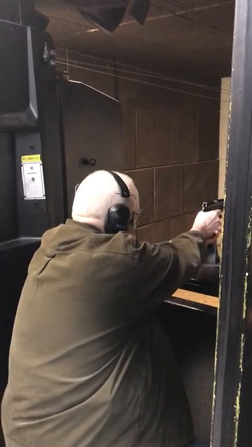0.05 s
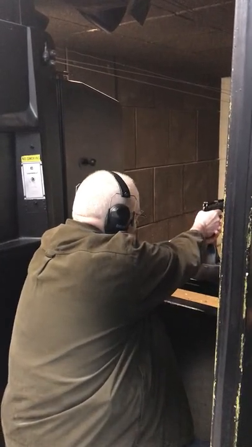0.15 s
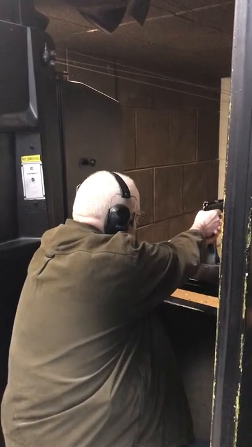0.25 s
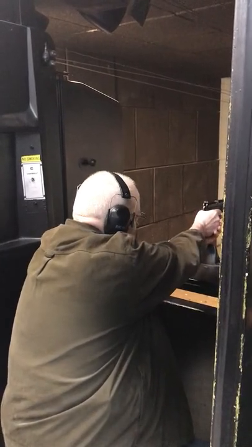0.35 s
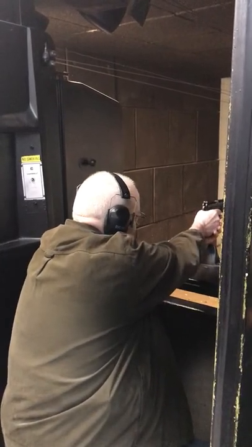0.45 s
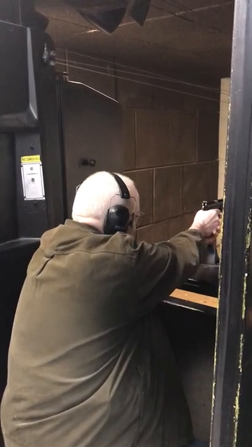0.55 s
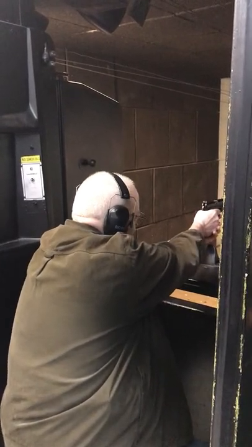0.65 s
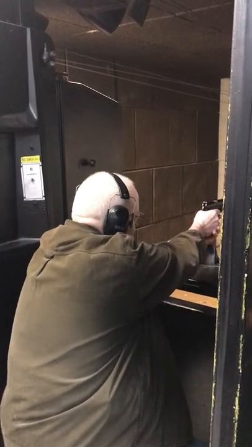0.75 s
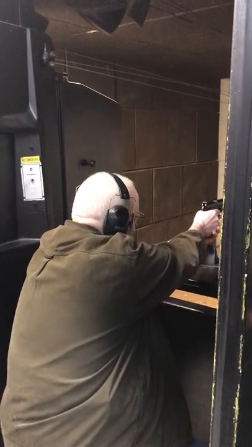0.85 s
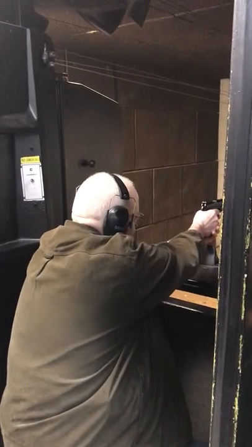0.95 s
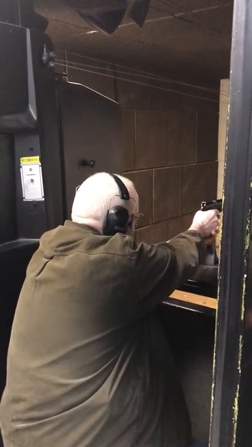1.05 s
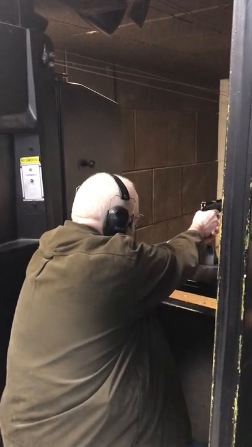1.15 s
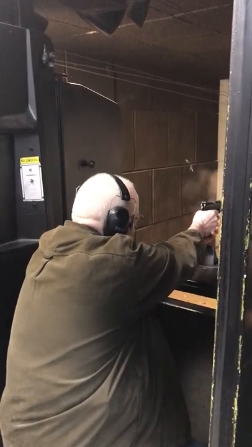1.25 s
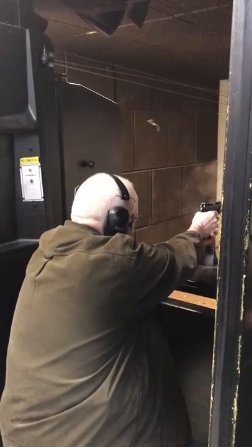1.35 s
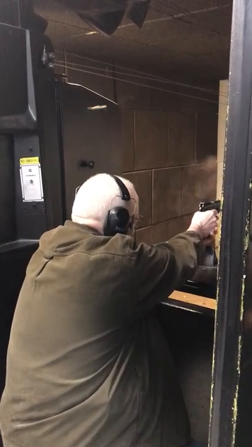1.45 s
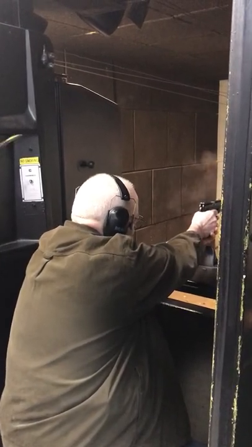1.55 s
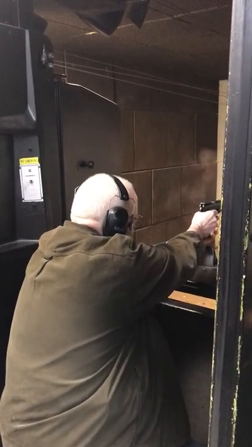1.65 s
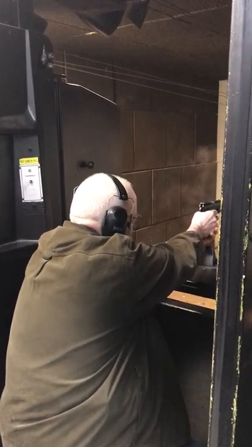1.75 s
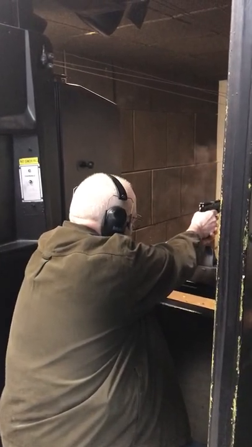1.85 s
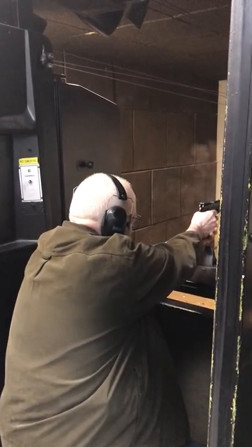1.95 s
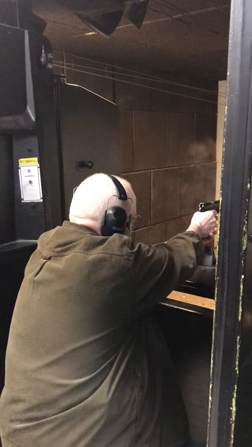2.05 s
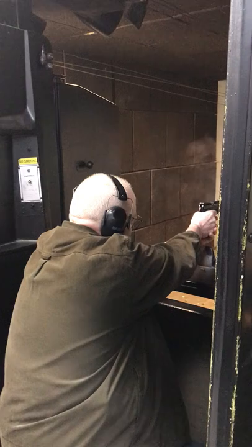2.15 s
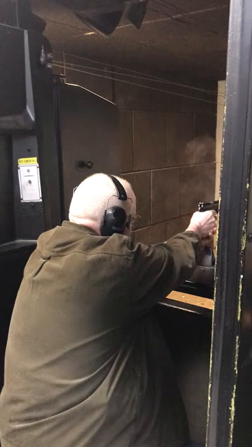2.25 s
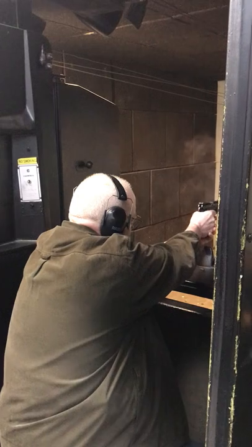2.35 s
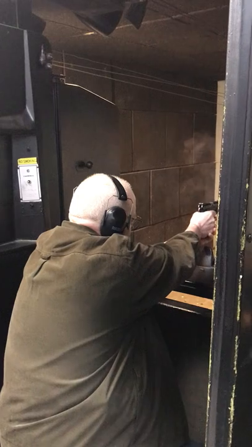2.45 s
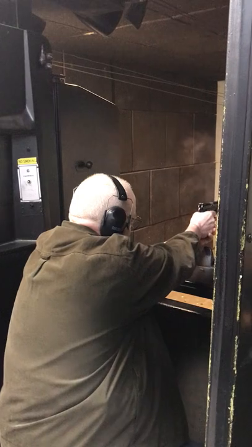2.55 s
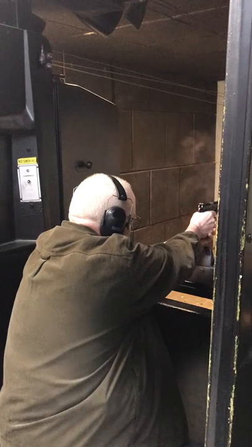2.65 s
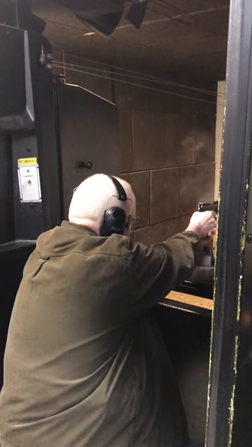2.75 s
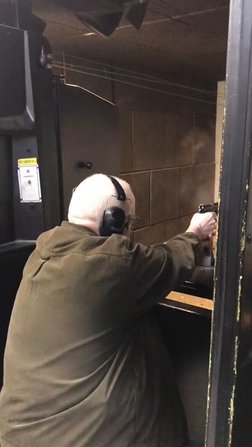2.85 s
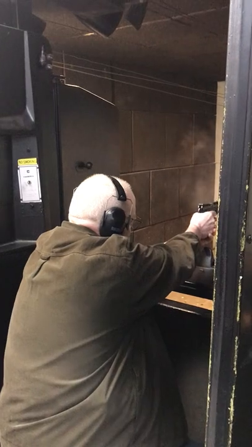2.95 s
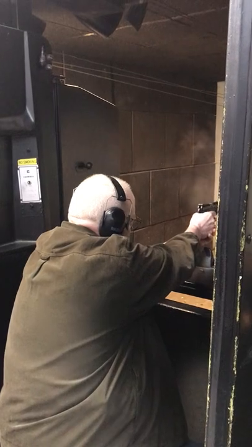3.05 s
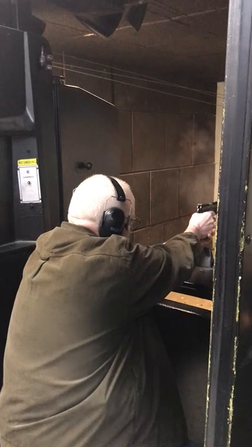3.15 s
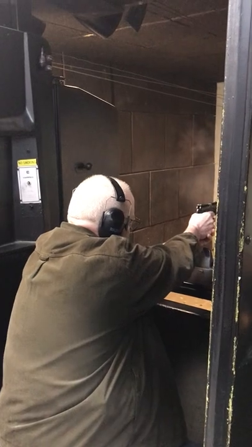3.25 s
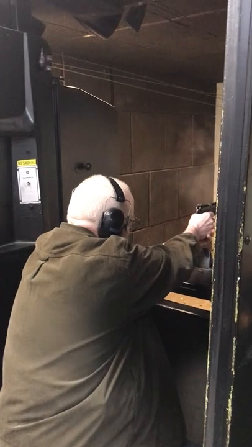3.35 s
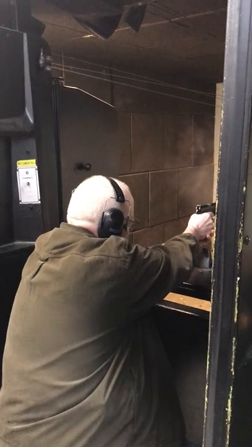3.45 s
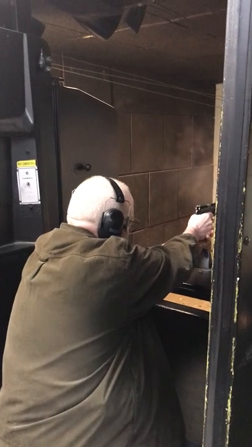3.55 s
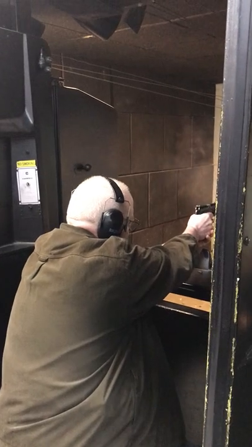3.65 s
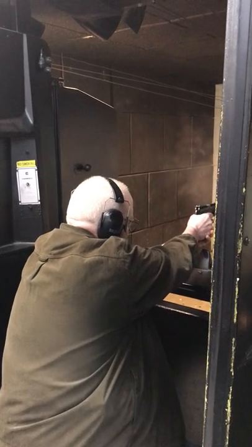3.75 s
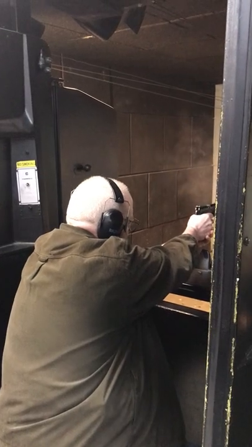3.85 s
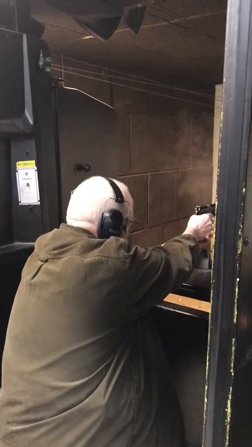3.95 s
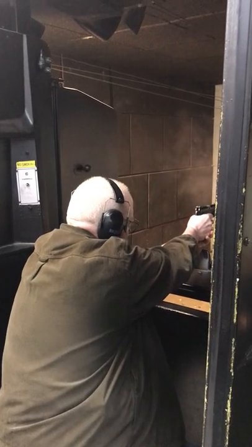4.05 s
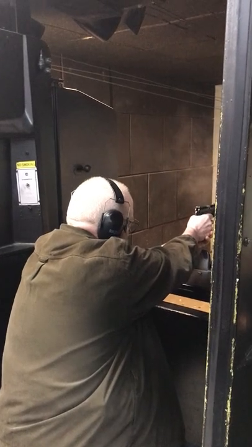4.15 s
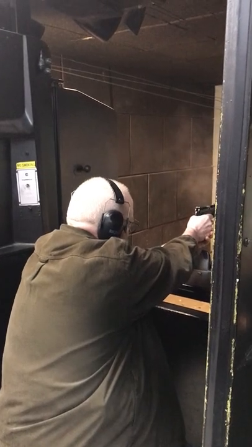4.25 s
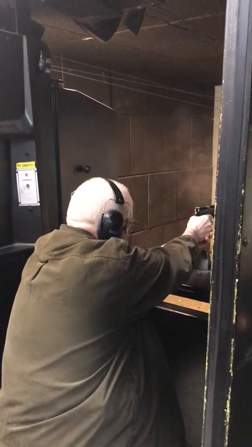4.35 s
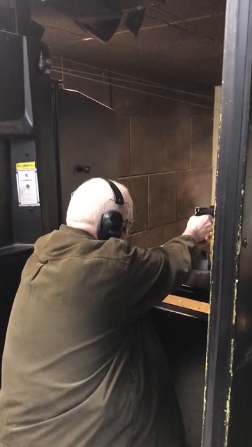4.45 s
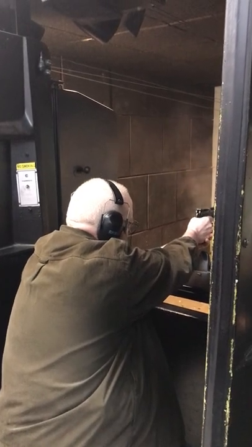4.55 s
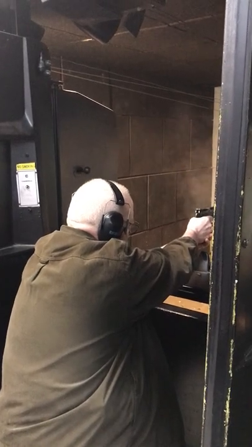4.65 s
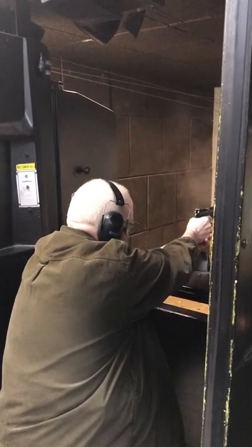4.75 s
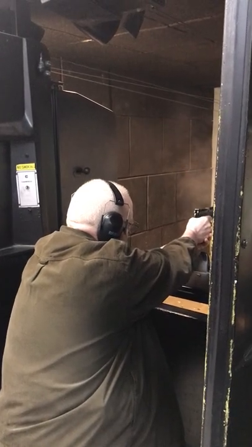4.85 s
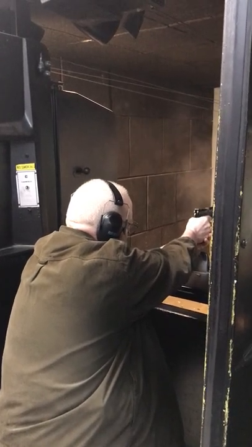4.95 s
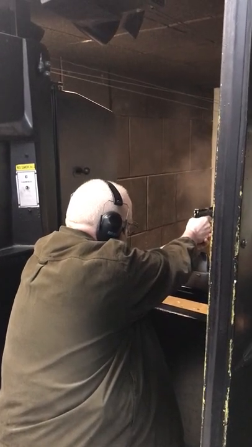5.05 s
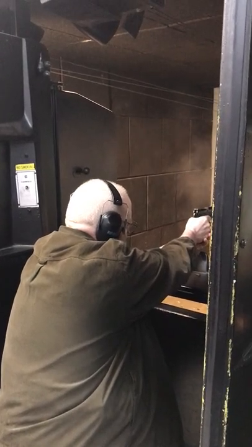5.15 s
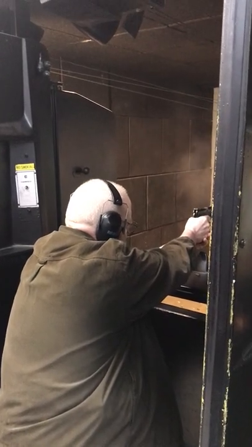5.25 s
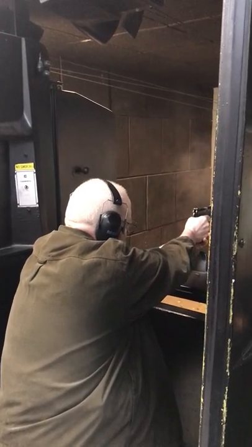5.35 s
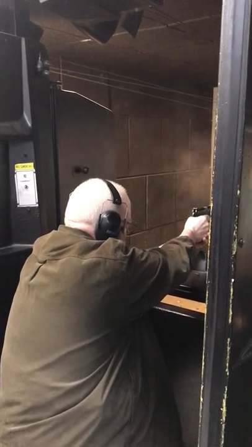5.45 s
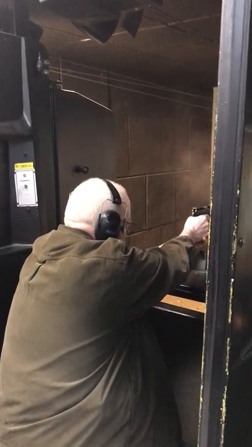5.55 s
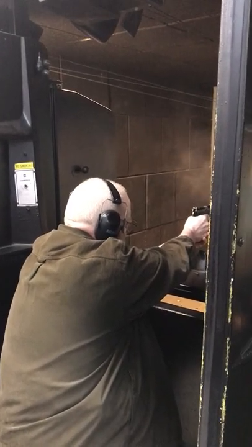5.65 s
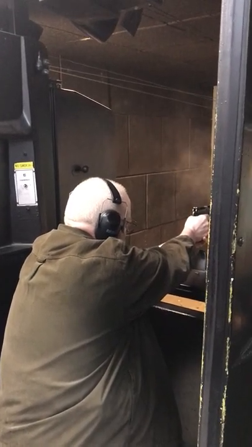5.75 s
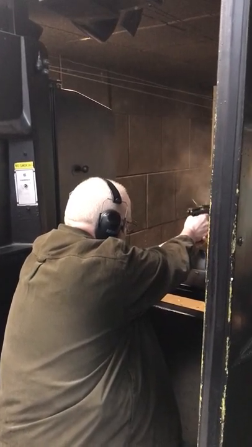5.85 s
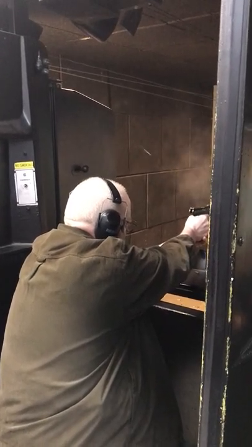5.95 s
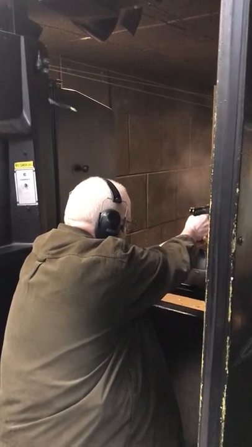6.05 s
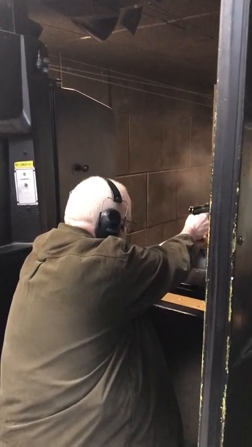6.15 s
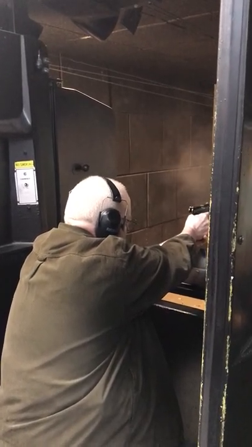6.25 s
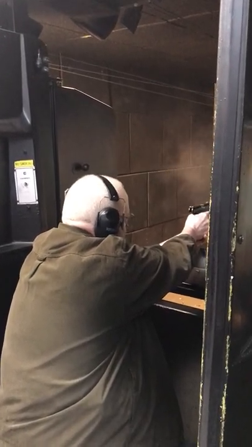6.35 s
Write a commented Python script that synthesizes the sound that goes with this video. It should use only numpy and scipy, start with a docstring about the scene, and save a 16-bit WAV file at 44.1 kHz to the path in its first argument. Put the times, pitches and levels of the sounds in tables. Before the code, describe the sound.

Four loud, overloaded pistol shots boom through a concrete indoor range, each with ringing reverberation, while spent brass cases clink down over faint ventilation.

```python
"""Pistol shots in a concrete indoor range

Four shots heard from just behind the booth: decaying noise and ringing modes, overloading the input.
Every shot sets off the same long reverberation, plus a fresh layer of first reflections.
Brass cases land with clicks, knocks and rings of resonant noise, and one of them skids.
Underneath, ventilation hums in sines and rushes as noise, with faint ticking for the first 4.6 s."""
import sys
import numpy as np
from scipy import signal
from scipy.fft import rfft, irfft, next_fast_len
from scipy.io import wavfile

SR = 44100
rng = np.random.default_rng(int(sys.argv[2]) if len(sys.argv) > 2 else 0)


def persist_wave(psi):
    """Save psi, clipped to +-1, as 16-bit WAV."""
    counts = np.round(np.clip(psi, -1, 1) * 32767).astype(np.int16)
    wavfile.write(sys.argv[1], SR, np.atleast_2d(counts).T)


N = 282681

# fan hum: (frequency [Hz], level [dB rms])
FAN_HUM = [(240, -70.5), (300, -85), (360, -70.5), (480, -82), (720, -77), (1320, -83)]
# moving air: (frequency [Hz], level [dB per octave])
MOVING_AIR = [(30, -73), (63, -73.5), (125, -77.5), (250, -77.5), (500, -75.5), (1000, -78), (2000, -80),
              (4000, -79), (8000, -78), (15000, -79)]
# cases landing: (time [s], low ring [dB], high ring [dB], knock [dB], knock centre [Hz])
CASE_LANDINGS = [(2.1, -55, -72, -44.5, 3880), (2.341, -45, -59, -54, 6400), (2.678, -49.5, -62, -58, 7230),
                 (3.397, -65, -60, -63, 8500), (3.895, -58, -65, -59, 4710), (4.018, -64, -70, -69, 5400),
                 (4.286, -63, -68, -63, 4800), (5.173, -60, -63, -51, 8600), (5.776, -42.5, -50, -50, 7200),
                 (6.258, -53, -56, -55, 8500)]
# modes of a brass case: (frequency [Hz], width [Hz], level over the ring level [dB], t60 [s])
BRASS_MODES = [(5135, 500, -7, .2), (5450, 320, -2.5, 0.3), (5680, 320, -3, .22), (6300, 550, -9.5, 0.34),
               (6600, 150, -17, 0.17), (8096, 150, -21, 0.14), (11000, 1500, -8.5, .16),
               (12000, 220, -5.5, .24)]
# shots: (time [s], strength [dB]); the levels in the five tables below are before this strength
SHOTS = [(1.2443, -1.9), (2.7482, -2.5), (4.4464, -2.5), (5.9114, -2.5)]
# first reflections inside the booth: (frequency [Hz], level [dB per octave], t60 [s])
BOOTH_REFLECTIONS = [(30, -22.5, 0.6), (63, -10, 0.22), (125, 1, .4), (245, 4, 0.28), (460, 15.5, .37),
                     (1000, 16, .37), (2000, 16, .36), (4000, 15, 0.38), (7640, 7, .28), (14900, 4, .23)]
# reverberation of the lane: (frequency [Hz], level [dB per octave], t60 [s])
LANE_REVERB = [(30, -37, 0.54), (63, -28, 0.29), (126, -15, 1.05), (242, -9, 1.035), (490, 0.5, 0.82),
               (1070, 9, 0.78), (1930, 4.5, 0.78), (4160, 0.5, 0.74), (6500, 1.5, 0.55), (9400, -7, 0.36),
               (14000, -9.5, .28)]
# what lingers at the far end of the hall: (frequency [Hz], level [dB per octave], t60 [s])
FAR_END_REVERB = [(30, -67, 9.6), (62, -54.5, 6.8), (125, -50.5, 2.2), (250, -44, 2.3), (500, -36.5, 2.4),
                  (997, -31, 3), (1990, -31, 2.4), (4000, -33, 1.6), (6700, -43, 1.25), (9500, -57, 1.1),
                  (14000, -73, 1.0)]
# standing waves between the walls: (frequency [Hz], level [dB], t60 [s])
WALL_MODES = [(172, -15, 1.05), (306, -7, .85), (348, -6, .8), (566, 3, .68), (592, -6, .85),
              (766, -2, .68), (812, -3, .68), (1056, -3, .68), (1256, -2, .68), (1394, -7, .75),
              (1726, -3, .7), (2003, 0, .7), (2125, -6, .7), (2620, -5, .7), (2805, -6, .7)]
# steelwork that keeps ringing after the blast: (frequency [Hz], level [dB], t60 [s])
STEEL_MODES = [(662, -28, 1.8), (729, -25, 1.9), (815, -29, 2.0), (832, -37, 2.9), (1001, -42, 3.8),
               (1035, -44, 4.2), (1084, -37, 2.6), (1188, -23, 1.75), (1340, -25, 1.8), (1427, -31, 1.8),
               (1507, -48, 3.4), (1609, -30, 1.8), (1797, -50, 3.2)]

# a harder contact knocks higher and much more broadly: the width grows as a power of the centre
KNOCK_HZ, KNOCK_WIDTH_HZ, KNOCK_BROADENING = 4000, 1900, 2.1
KNOCK_T60_S, KNOCK_TOP_HZ = 0.23, 14000
CLICK_DB, CLICK_T60_S = 4, 0.017  # contact click, relative to the knock
BUILD_S = 0.0027  # reflections pile up this quickly
SKID_AT_S, SKID_SWELL_S, SKID_DB, SKID_HZ, SKID_WIDTH_HZ = 2.267, 0.01, -36.5, 4240, 5900
SKID_LOW_RING_DB, SKID_HIGH_RING_DB = -62, -45
# a lull while the blast is away down the lane; the roar also sloshes once per round trip
LULL_AT_S, LULL_WIDTH_S, LULL_DB = 0.036, 0.015, -7.5
ROUND_TRIP_S, SLOSH_DB = 0.108, 0.5
CLIP_LEVEL = 0.63  # ceiling of the overloaded input, as a fraction of full scale
CUTOFF_HZ = 15900


def from_db(db):
    """Decibels to gain."""
    return 10 ** (np.asarray(db) / 20)


def at_hz(rows, hz, axis=1):
    """One column of a table, read on a log-frequency axis."""
    rows = np.array(rows)
    return np.interp(np.log(np.maximum(hz, 1)), np.log(rows[:, 0]), rows[:, axis])


def fade(t, t60):
    """Exponential decay, 60 dB down at t60."""
    return np.exp(-np.log(1000) * t / t60)


def rise(t, rise_s):
    """Exponential approach to full level."""
    return 1 - np.exp(-t / rise_s)


def add(out, s, sound):
    """Mix a sound in at time s, cutting whatever runs past the end."""
    start = int(round(s * SR))
    out[start:start + len(sound)] += sound[:max(len(out) - start, 0)]


def pink(size):
    """Frequencies and random spectrum of a noise above 16 Hz with rms 1 in every octave."""
    hz = np.maximum(np.arange(size // 2 + 1) * SR / size, 1)
    equal_octaves = np.sqrt(SR / (2 * np.log(2) * hz))
    return hz, rfft(rng.standard_normal(size)) * equal_octaves * (hz > 16)


def coloured(rows, size):
    """Noise with the given dB per octave."""
    hz, spectrum = pink(size)
    return irfft(spectrum * from_db(at_hz(rows, hz)), size)


def narrow_noise(centre_hz, width_hz, size):
    """Noise through a resonance applied twice; rms 1."""
    hz = np.arange(size // 2 + 1) * SR / size
    resonance_twice = 1 / (1 + (2 * (hz - centre_hz) / width_hz) ** 2)
    noise = irfft(rfft(rng.standard_normal(size)) * resonance_twice, size)
    return noise / noise.std()


def ventilation(tick_db=-72, tick_hz=3200, tick_width_hz=3500, tick_peak_s=0.008, tick_gap_s=0.051):
    """Steady hum of sines and rushing air, with a faint uneven ticking of noise."""
    t = np.arange(N) / SR
    hum = np.zeros(N)
    for hz, db in FAN_HUM:
        hum += np.sqrt(2) * from_db(db) * np.sin(2 * np.pi * (hz * t + rng.random()))
    age = t[:SR // 10] / tick_peak_s
    tick_shape = age * np.exp(1 - age)
    ticks = np.zeros(N)
    for k, (late, loud) in enumerate(rng.random(size=(90, 2))):
        add(ticks, (k + late / 2) * tick_gap_s, loud * tick_shape)
    size = next_fast_len(N)
    air = coloured(MOVING_AIR, size)[:N]
    tick_noise = narrow_noise(tick_hz, tick_width_hz, size)[:N]
    return hum + air + from_db(tick_db) * ticks * tick_noise


def contact_noise(centre_hz, width_hz, size):
    """Broad noise of brass meeting a hard surface, its top absorbed by the room."""
    absorb = signal.butter(2, KNOCK_TOP_HZ, fs=SR, output="sos")
    return signal.sosfilt(absorb, narrow_noise(centre_hz, width_hz, size))


def brass_ring(t, low_db, high_db):
    """A thin case rings, smeared by the room; where it is hit decides between its low and high modes."""
    out = np.zeros(len(t))
    for hz, width_hz, db, t60 in BRASS_MODES:
        strength_db = high_db if hz > 10000 else low_db
        out += from_db(strength_db + db) * narrow_noise(hz, width_hz, len(t)) * fade(t, t60)
    return out


def cases():
    """Each landing is a contact click, then a knock and a ring of thin brass."""
    t = np.arange(SR // 2) / SR
    build = rise(t, BUILD_S)
    click_and_knock = from_db(CLICK_DB) * fade(t, CLICK_T60_S) + build * fade(t, KNOCK_T60_S)
    out = np.zeros(N)
    for s, low_db, high_db, knock_db, knock_hz in CASE_LANDINGS:
        width_hz = KNOCK_WIDTH_HZ * (knock_hz / KNOCK_HZ) ** KNOCK_BROADENING
        knock = from_db(knock_db) * contact_noise(knock_hz, width_hz, len(t)) * click_and_knock
        add(out, s, knock + build * brass_ring(t, low_db, high_db))
    return out


def skid():
    """A case slides for a moment: a broad scrape swells, with no click, and stirs mostly high modes."""
    t = np.arange(SR // 2) / SR
    scrape = from_db(SKID_DB) * contact_noise(SKID_HZ, SKID_WIDTH_HZ, len(t)) * fade(t, KNOCK_T60_S)
    ring = brass_ring(t, SKID_LOW_RING_DB, SKID_HIGH_RING_DB)
    out = np.zeros(N)
    add(out, SKID_AT_S, rise(t, SKID_SWELL_S) * (scrape + ring))
    return out


def ringing(t, modes):
    """Struck modes: decaying sines, each at a random phase."""
    out = np.zeros(len(t))
    for hz, db, t60 in modes:
        out += from_db(db) * fade(t, t60) * np.sin(2 * np.pi * (hz * t + rng.random()))
    return out


def diffuse(t, rows):
    """Countless echoes: noise in which each half octave dies at its own rate."""
    hz, spectrum = pink(len(t))
    out = np.zeros(len(t))
    for centre in 22 * 2 ** np.arange(0, 10, 0.5):
        # triangular bands, each crossfading into the next
        band_gain = np.maximum(1 - 2 * np.abs(np.log2(hz / centre)), 0)
        band = irfft(spectrum * band_gain, len(t))
        out += band * from_db(at_hz(rows, centre)) * fade(t, at_hz(rows, centre, axis=2))
    return out


def pistol(moved_db=-7.0, moved_t60=0.27, fill_s=0.018):
    """Gun and walls stay put, so shots share one echo pattern; some first reflections shift with the aim."""
    t = np.arange(2 * SR) / SR
    lull_db = LULL_DB * np.exp(-0.5 * ((t - LULL_AT_S) / LULL_WIDTH_S) ** 2)
    slosh_db = SLOSH_DB * np.cos(2 * np.pi * t / ROUND_TRIP_S)
    fill = rise(t, fill_s)  # the long lane takes a moment to fill with sound
    roar = diffuse(t, BOOTH_REFLECTIONS) + fill * (diffuse(t, LANE_REVERB) + ringing(t, WALL_MODES))
    lingering = diffuse(t, FAR_END_REVERB) + ringing(t, STEEL_MODES)
    response = roar * from_db(lull_db + slosh_db) + lingering
    out = np.zeros(N)
    for s, db in SHOTS:
        shifted = from_db(moved_db) * coloured(BOOTH_REFLECTIONS, len(t)) * fade(t, moved_t60)
        add(out, s, from_db(db) * (response + shifted))
    return out


def scene():
    """Everything reaches one microphone, which feeds both channels."""
    mono = ventilation() + cases() + skid() + pistol()
    return np.tile(mono, (2, 1))


def record(dry, knee=13.0):
    """The overloaded input squares the wave off; then the top is cut."""
    # clip at twice the sample rate to limit aliasing; a higher knee turns the corner more sharply
    drive = signal.resample_poly(dry[0], 2, 1) / CLIP_LEVEL
    squared_off = CLIP_LEVEL * drive / (1 + np.abs(drive) ** knee) ** (1 / knee)
    clipped = signal.resample_poly(squared_off, 1, 2)
    lowpass = signal.firwin(255, CUTOFF_HZ, fs=SR, window="blackman")
    return np.tile(signal.fftconvolve(clipped, lowpass, "same"), (2, 1))


dry = scene()
out = record(dry)
persist_wave(out)
```